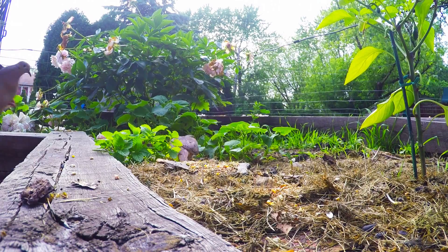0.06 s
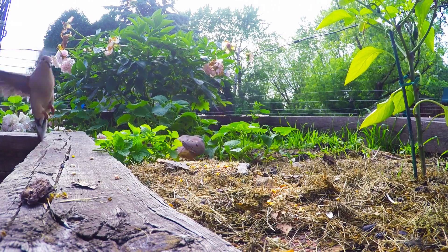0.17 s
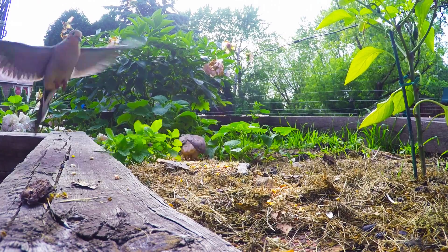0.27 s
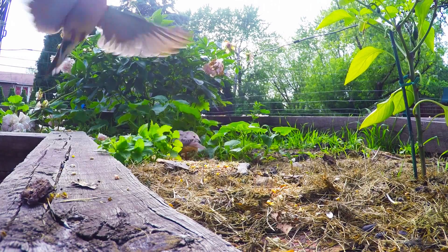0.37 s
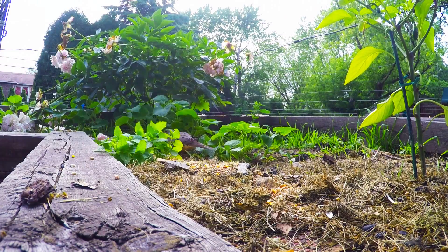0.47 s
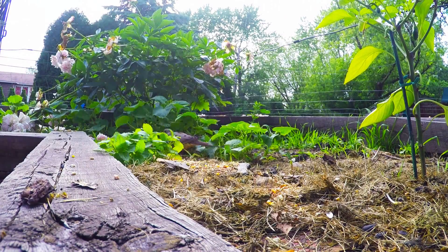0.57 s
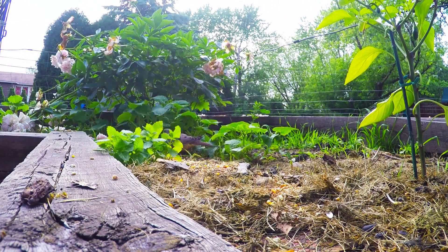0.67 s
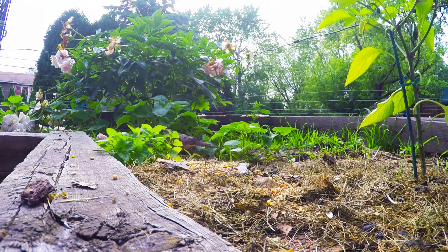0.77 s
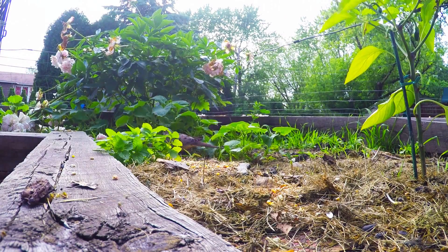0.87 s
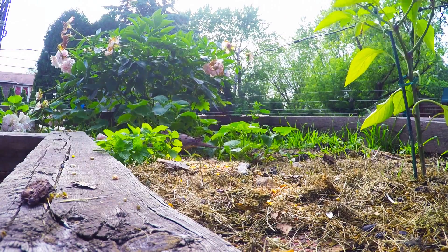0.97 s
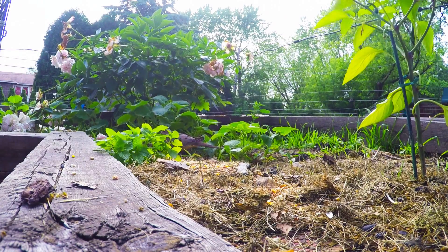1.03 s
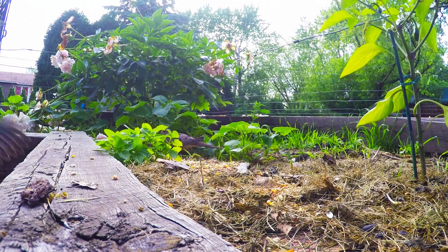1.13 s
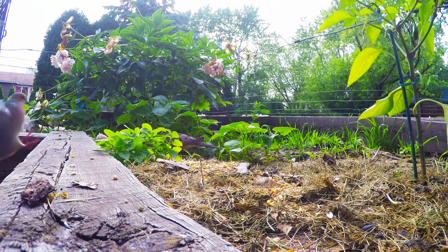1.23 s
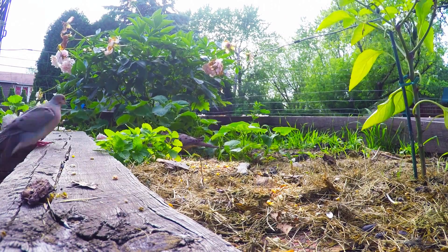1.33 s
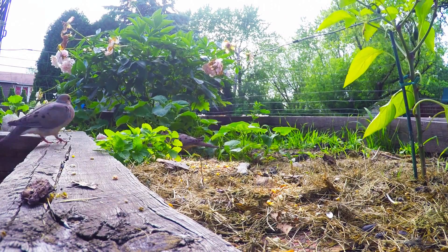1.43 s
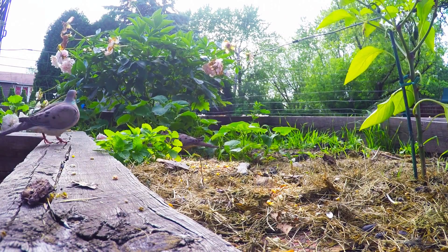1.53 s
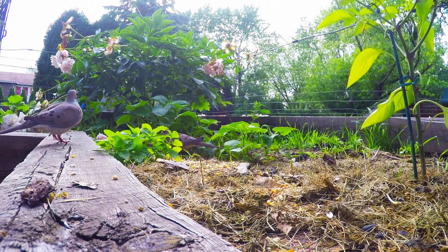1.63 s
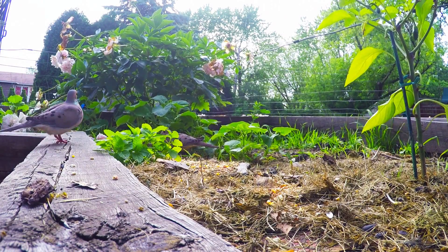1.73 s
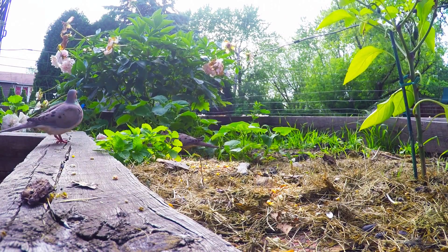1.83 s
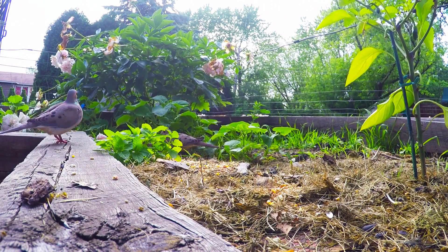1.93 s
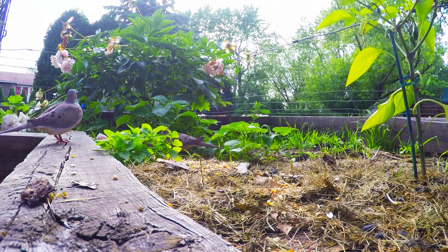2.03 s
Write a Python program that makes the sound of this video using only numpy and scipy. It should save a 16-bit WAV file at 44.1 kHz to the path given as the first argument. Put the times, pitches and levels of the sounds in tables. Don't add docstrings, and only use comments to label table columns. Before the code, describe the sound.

Dove wingbeats very close to the microphone: rapid breathy whistles, feather snaps and low gusts of air, slowing into a landing with faint claw ticks on wood, over quiet distant traffic and birds outdoors.

```python
import sys
import numpy as np
from scipy import signal
from scipy.fft import rfft, irfft
from scipy.io import wavfile
from scipy.ndimage import uniform_filter1d

SR = 44100
rng = np.random.default_rng(int(sys.argv[2]) if len(sys.argv) > 2 else 0)


def persist_wave(psi):
    counts = np.round(np.clip(psi, -1, 1) * 32767).astype(np.int16)
    wavfile.write(sys.argv[1], SR, np.atleast_2d(counts).T)


def field_ratio(decibels):
    return 10 ** (np.asarray(decibels, dtype=float) / 20)


N = 92610

# f/Hz, level/dB
TRAFFIC_SPECTRUM = [(12, -60), (20, -6), (49, -3), (98, 1), (120, -15), (182, -15.5), (325, -33.5),
                    (500, -43.5), (650, -51.5), (1100, -120)]
# f/Hz, level/dB
AIR_SPECTRUM = [(240, -49), (400, -3.5), (459, -5), (955, -9), (1170, -9.5), (4400, -11), (15400, -28.5)]
# t/s, f/Hz, level/dB
BIRD_NOTES = [
    [(1.526, 1920, -66), (1.542, 2100, -64), (1.557, 3100, -64), (1.578, 3520, -60), (1.61, 3200, -65),
     (1.642, 2650, -72)],
    [(1.573, 4120, -60), (1.586, 4000, -60), (1.605, 3650, -62), (1.642, 3450, -70)],
    [(1.503, 4086, -71), (1.536, 3960, -65), (1.548, 4600, -70)],
    [(.95, 3370, -68), (1.02, 3300, -73)],
    [(1.3, 3850, -76), (1.365, 4000, -75)],
    [(.708, 5700, -68), (.742, 4450, -74)],
]
# t/s, peak level/dB, swing/s, push share/0-1 (the rest is suction)
GUSTS = [(0.101, -39.5, 0.029, 1), (0.212, -27.5, 0.037, 0.25), (0.243, -22, 0.017, 0.66),
         (0.261, -27.5, 0.011, 0.88), (0.283, -21, 0.01, 0.79), (0.297, -19, 0.021, 0.55),
         (0.382, -20.5, 0.019, 0.6), (.431, -22.5, 0.013, 0.65), (.47, -15, .021, .6),
         (.5585, -10, .019, .5), (0.604, -20.5, 0.02, 1), (0.626, -20, 0.047, 0.8), (0.65, -13, 0.025, 0.5),
         (0.771, -25.5, 0.031, 1), (0.792, -24.5, 0.022, 0.05), (0.821, -21, 0.021, 0.63),
         (0.906, -25, 0.013, 1), (0.926, -24.5, 0.025, 0.4), (1.047, -29, 0.023, 0.1),
         (1.219, -26.5, 0.036, 0.42), (1.261, -33.5, .03, 0.8), (0.964, -31, .025, 0.9)]
# t/s, level/dB
STIRRED_AIR = [(0, -37.5), (.3, -35.5), (.8, -41.5), (1.15, -38), (1.4, -43.5), (2.1, -42.5)]
# t/s, length/s, level/dB
UPSTROKE_PUFFS = [(0.105, 0.008, -54), (0.248, 0.066, -47.5), (0.333, 0.027, -48), (0.41, 0.057, -54.5),
                  (0.507, 0.023, -54)]
# t/s, peak level/dB, length/ms, top f/Hz
SNAPS = [(.055, -52, 2.8, 9000), (0.223, -63, 2.8, 12000), (0.253, -41, 1.6, 10900),
         (0.299, -56, 3.9, 13000), (.338, -44.5, 2, 7000), (0.387, -56, 7.9, 14000),
         (0.425, -46.5, 4.5, 7000), (0.473, -57, 2.6, 13000), (.513, -45.5, 3.9, 6400),
         (.599, -47, 3.8, 11900), (.638, -43, 9.8, 5900), (0.768, -51, 3.7, 8900), (.904, -50, 4.5, 4500),
         (1.033, -51, 3.3, 4970), (1.134, -52, 5.2, 4230), (1.183, -55, 5, 10200), (1.236, -56.5, 9, 8000),
         (1.282, -67, 5.6, 5000), (1.341, -54, 3.3, 1180), (1.384, -61, 5, 6000), (1.405, -59, 7.6, 5030),
         (1.533, -55.5, 2.5, 11900)]
# start t/s, length/s, level/dB, swell from start to end/dB
SWISHES = [(0, 0.005, -43, -22.5), (0.053, 0.045, -53.5, 2), (0.184, 0.07, -50, 7),
           (0.248, 0.055, -50, -4.5), (0.329, 0.056, -51, -2), (0.411, 0.052, -52, 7.5),
           (0.507, 0.093, -50.5, -10.5), (0.599, 0.062, -50.5, -7.5), (0.766, 0.046, -49, -3.5),
           (.9, 0.031, -50.5, -1.5), (1.022, 0.037, -56.5, 5), (1.152, 0.053, -55.5, 12),
           (1.227, 0.019, -57, -16), (1.281, 0.025, -61.5, -7), (1.355, 0.072, -61.5, -3)]
# f/Hz, level/dB
SWISH_SPECTRUM = [(150, 10), (400, -1), (1000, -6.5), (2200, -3), (4500, -10.5), (8000, -16.5),
                  (15000, -27.5)]
# t/s, level/dB
WING_SHEEN = [(0, -1), (.3, 4), (.65, 4), (.8, 6), (.95, 6.5), (1.3, 2.5)]
# t/s, length/s, f/Hz, level/dB, end f over start f/ratio
SQUEAKS = [(0.068, 0.0069, 1330, -42, 1.05), (0.19, 0.0054, 1310, -52, .95),
           (0.238, 0.016, 1218, -39.5, .9), (0.249, .008, 1050, -43, .7), (0.293, 0.0076, 1460, -45, 0.78),
           (0.348, 0.005, 1350, -52.5, .85), (0.419, 0.017, 960, -47, .78), (0.437, .007, 1300, -48.5, 1.2),
           (0.498, 0.011, 1000, -53, .8), (0.641, 0.0044, 669, -44, .9), (0.813, 0.0065, 1274, -47.5, .9),
           (1.368, 0.0036, 1700, -54.5, .85)]
# t/s, f/Hz, level/dB
HOVER_WHISTLES = [
    [(0.068, 1876, -52), (0.076, 1982, -48), (0.088, 1967, -45.5), (0.104, 1850, -60)],
    [(0.186, 1995, -55.5), (0.194, 1950, -46), (0.202, 2340, -42), (0.206, 2316, -41.5), (0.21, 2035, -53),
     (0.214, 1856, -45), (0.222, 1776, -47)],
    [(0.261, 2045, -45), (0.271, 2118, -53), (0.281, 2184, -42.5), (0.287, 2020, -50), (0.292, 1840, -76)],
    [(0.348, 1918, -61), (0.366, 2112, -44.5), (0.372, 2030, -45), (0.379, 2130, -71)],
    [(0.431, 2080, -63), (0.437, 2088, -47), (0.447, 2230, -50), (0.455, 2100, -51), (0.463, 1830, -43),
     (0.468, 1670, -58)],
    [(0.52, 2040, -67), (0.528, 1987, -52), (0.542, 2080, -35), (0.548, 2010, -36), (0.554, 1730, -40.5),
     (0.558, 1640, -50)],
]
# t/s, f/Hz, level/dB
LANDING_WHISTLES = [
    [(.603, 2030, -58), (.611, 2001, -46), (.629, 2070, -39), (.635, 1950, -41), (.642, 1750, -58)],
    [(.781, 1693, -57), (.79, 2000, -42), (.792, 2020, -37), (.797, 2030, -43), (.802, 2043, -38),
     (.811, 1994, -44.5), (.817, 1928, -64)],
    [(.912, 1952, -58), (.92, 1900, -42), (.927, 1915, -39), (.938, 2000, -44), (.951, 2080, -58)],
    [(1.034, 1854, -62), (1.039, 1860, -46), (1.048, 1870, -47), (1.062, 2000, -54), (1.072, 1900, -58),
     (1.086, 1860, -70)],
    [(1.193, 1650, -52), (1.1975, 1900, -35), (1.202, 2170, -44), (1.207, 2050, -43), (1.214, 1820, -43),
     (1.218, 1720, -62)],
]
# multiple of the pitch, level/dB
OVERTONES = [(2, -11.5), (3, -20.5), (4, -27), (5, -33), (6, -37), (7, -39)]
# octave/dB, higher overtones/dB, roughness/0-1
WHISTLE_TIMBRE = [(-2, 0, .6), (1, -2, 1), (2.5, 2, 1), (8, -1, .7), (3, -2, .7), (-1.5, -3, .5),
                  (.5, -2, .6), (0, 2, .6), (0, 2, .35), (-1, 3, .4), (4, 0, .6)]


def walk(rate_hz):
    width = max(int(SR / rate_hz), 1)
    wander = uniform_filter1d(uniform_filter1d(rng.standard_normal(N), width), width)
    return wander / wander.std()


def noise(spectrum):
    points = np.array(spectrum)
    f = np.maximum(np.arange(N // 2 + 1) * SR / N, 1)
    level_db = np.interp(np.log(f), np.log(points[:, 0]), points[:, 1])
    x = irfft(rfft(rng.standard_normal(N)) * field_ratio(level_db), N)
    return x / x.std()


def follow(curve, t, column=1):
    points = np.array(curve)
    return np.interp(t, points[:, 0], points[:, column])


def tone(curve, overtones, wobble, flutter_db, breath, fizz_db=-60):
    flutter_hz, breath_hz, edge_s = 250, 600, 0.0034
    t = np.arange(N) / SR
    pitch = follow(curve, t) * (1 + wobble * walk(flutter_hz))
    phase = 2 * np.pi * np.cumsum(pitch) / SR
    edge = np.clip(np.minimum(t - curve[0][0], curve[-1][0] - t) / edge_s + 1, 0, 1)
    hiss = np.diff(rng.standard_normal(N + 1)) / 2
    stack = field_ratio(fizz_db) * (1 + np.cos(phase)) * hiss
    for k, db in [(0.99, 0.07)] + overtones:
        smear = breath * k * (walk(breath_hz) + 1j * walk(breath_hz)) / 2
        partial = np.imag((1 + smear) * np.exp(1j * k * phase))
        stack = stack + field_ratio(db + flutter_db * walk(flutter_hz)) * partial
    return np.sqrt(2) * edge * field_ratio(follow(curve, t, 2)) * stack


def traffic_and_air():
    traffic = field_ratio(-41 + 2 * walk(11.3)) * noise(TRAFFIC_SPECTRUM)
    air = field_ratio(-65.5 + 0.31 * walk(18)) * noise(AIR_SPECTRUM)
    return traffic + air


def songbirds():
    return sum(tone(note, [], wobble=0.008, flutter_db=2, breath=0.6) for note in BIRD_NOTES)


def gusts(t):
    lobe_width, suction_gain = 0.31, 1.5
    out = 0
    for s, db, swing, push in GUSTS:
        pull_lobe = np.exp(-((t - s + swing / 4) / (lobe_width * swing)) ** 2)
        push_lobe = np.exp(-((t - s - swing / 4) / (lobe_width * swing)) ** 2)
        out = out + 2 * field_ratio(db) * (push * push_lobe - suction_gain * (1 - push) * pull_lobe)
    return out


def stirred_air(t):
    rumble = noise([(15, -8), (40.4, 0), (90, -14), (200, -30), (600, -44), (2000, -60)])
    wash = field_ratio(-20) * noise([(100, 14), (250, -7), (1000, -7.5), (5000, -16), (15000, -68)])
    return field_ratio(follow(STIRRED_AIR, t)) * (rumble + wash)


def upstroke_puffs(t):
    env = sum(field_ratio(db) * np.exp(-(2 * (t - s) / length) ** 2) for s, length, db in UPSTROKE_PUFFS)
    return env * noise([(80, -31), (200, 11.5), (1300, 4), (3000, -38)])


def snaps():
    low_share = 0.07
    out = np.zeros(N)
    ms = (np.arange(2048) - 1024) * 1000 / SR
    for s, db, length_ms, top_hz in SNAPS:
        band = signal.butter(3, [low_share * top_hz, top_hz], "band", fs=SR, output="sos")
        burst = signal.sosfilt(band, rng.standard_normal(len(ms)))
        env = np.exp(-(2 * ms / length_ms) ** 2)
        start = int(s * SR) - len(ms) // 2
        out[start:start + len(ms)] += field_ratio(db) * env * burst / burst.std()
    return out


def swishes(t):
    attack_s, t60_s = 0.0017, 0.16
    power = 0
    for s, length, db, swell_db in SWISHES:
        swell = swell_db * (np.clip((t - s) / length, 0, 1) - 0.5)
        tail = -60 * np.maximum(t - s - length, 0) / t60_s
        opening = np.clip((t - s) / attack_s + 0.5, 0, 1)
        power = power + opening ** 2 * field_ratio(2 * (db + swell + tail))
    air = noise(SWISH_SPECTRUM)
    treble = signal.sosfiltfilt(signal.butter(1, 7000, "high", fs=SR, output="sos"), air)
    turned_air = air + (field_ratio(follow(WING_SHEEN, t)) - 1) * treble
    rustle = field_ratio(2.8 * walk(223))
    return np.sqrt(power) * rustle * turned_air


def squeaks():
    out = 0
    for s, length, hz, db, glide in SQUEAKS:
        begin = (s - length / 2, hz / glide ** 0.5, db - 7)
        end = (s + length / 2, hz * glide ** 0.5, db - 7)
        out = out + tone([begin, (s, hz, db), end], [], wobble=0.04, flutter_db=2.5, breath=0.8)
    return out


def whistles():
    out = 0
    for curve, (octave_db, upper_db, rough) in zip(HOVER_WHISTLES + LANDING_WHISTLES, WHISTLE_TIMBRE):
        overtones = [(k, db + (octave_db if k == 2 else upper_db)) for k, db in OVERTONES]
        whistle = tone(curve, overtones, wobble=0.015 * rough, flutter_db=2 * rough,
                       breath=0.6 * rough, fizz_db=-20.5)
        out = out + field_ratio(0.5) * whistle
    return out


def scene():
    t = np.arange(N) / SR
    background = traffic_and_air() + songbirds()
    moved_air = gusts(t) + stirred_air(t) + upstroke_puffs(t)
    feathers = snaps() + swishes(t) + squeaks() + whistles()
    return (background + moved_air + feathers)[None]


def low_pass(x):
    return signal.sosfilt(signal.butter(12, 15570, fs=SR, output="sos"), x)


def record(dry):
    x = signal.sosfilt(signal.butter(2, 13, "high", fs=SR, output="sos"), dry)
    x = signal.sosfilt(signal.ellip(14, 0.2, 70, 15420, fs=SR, output="sos"), x)
    return low_pass(x)


dry = scene()
out = record(dry)
persist_wave(out)
```